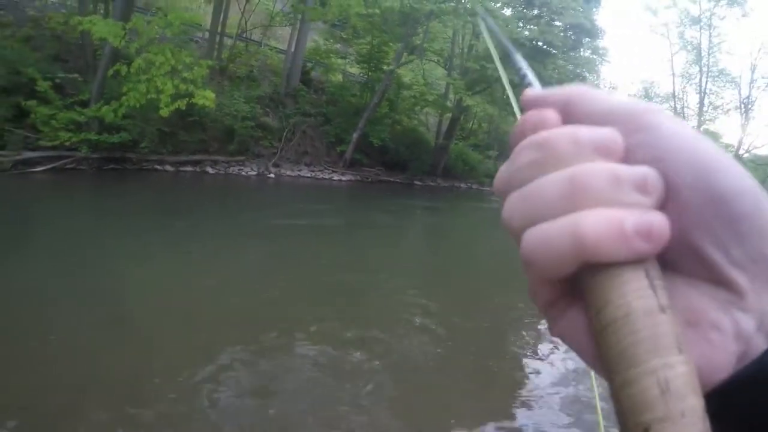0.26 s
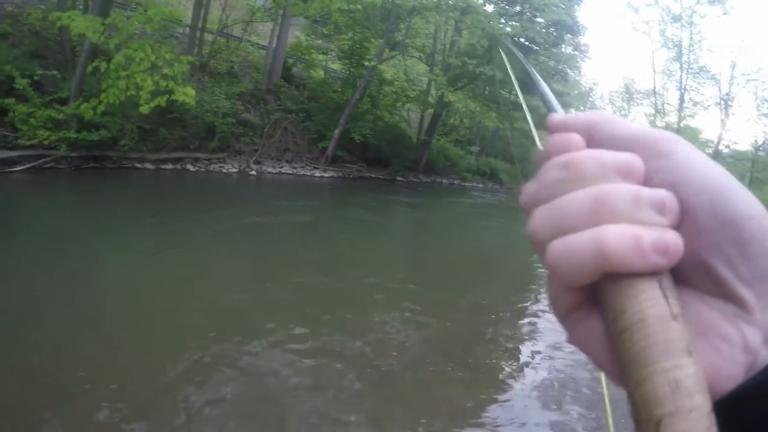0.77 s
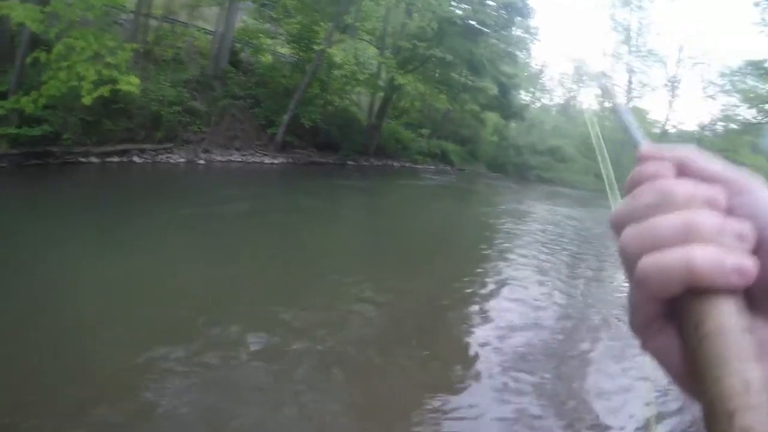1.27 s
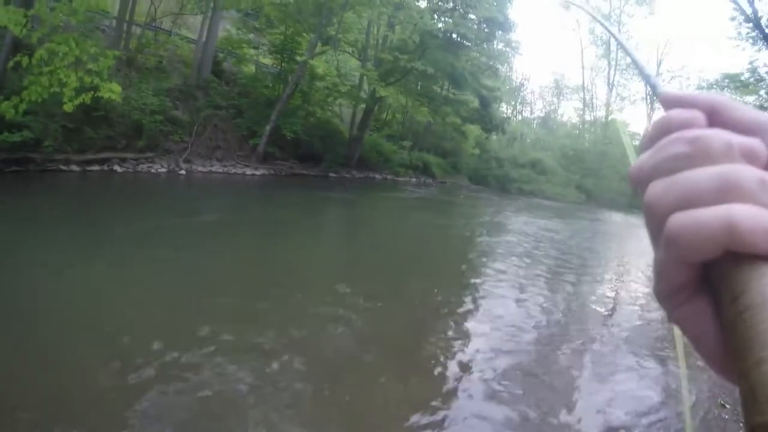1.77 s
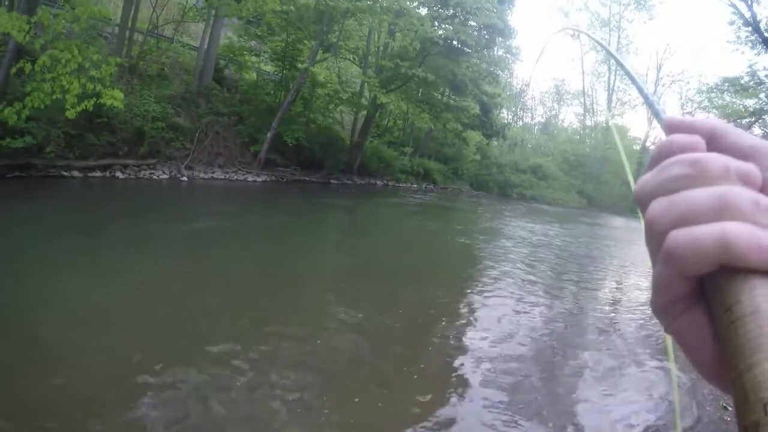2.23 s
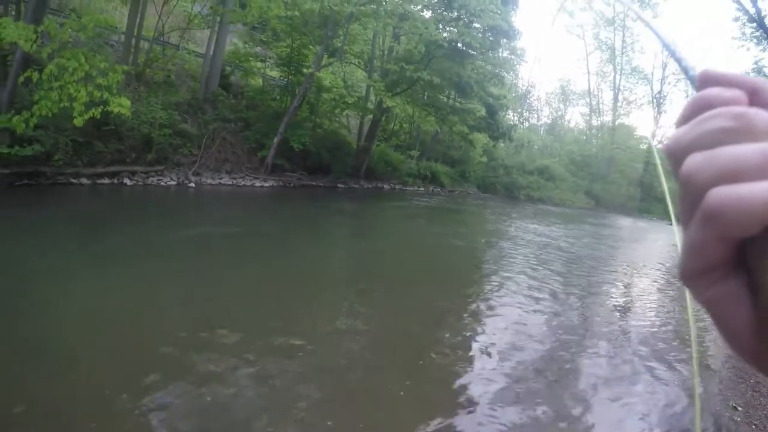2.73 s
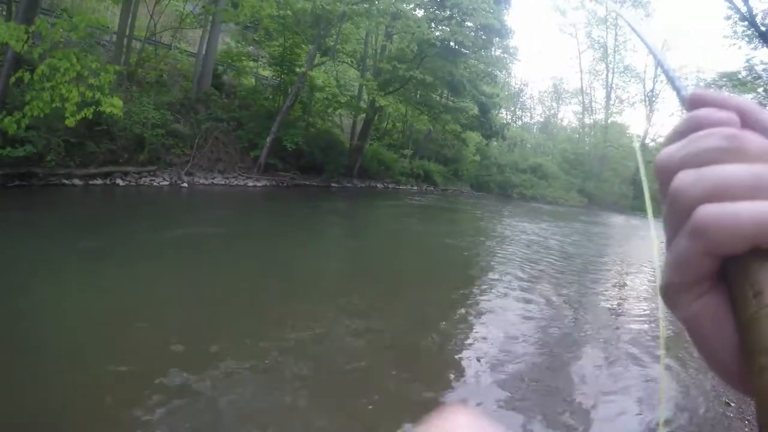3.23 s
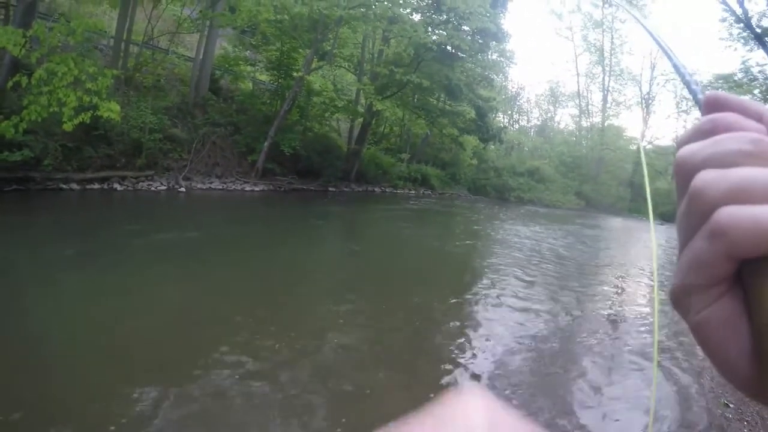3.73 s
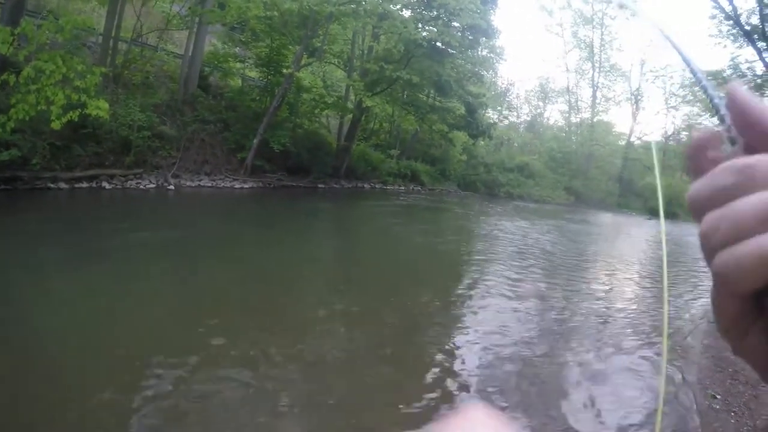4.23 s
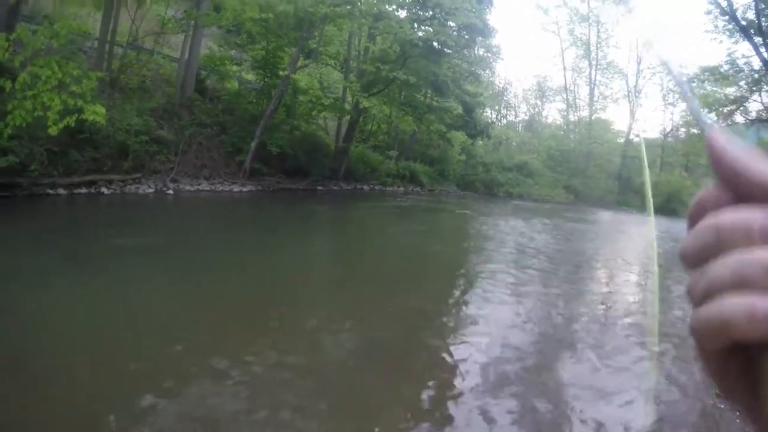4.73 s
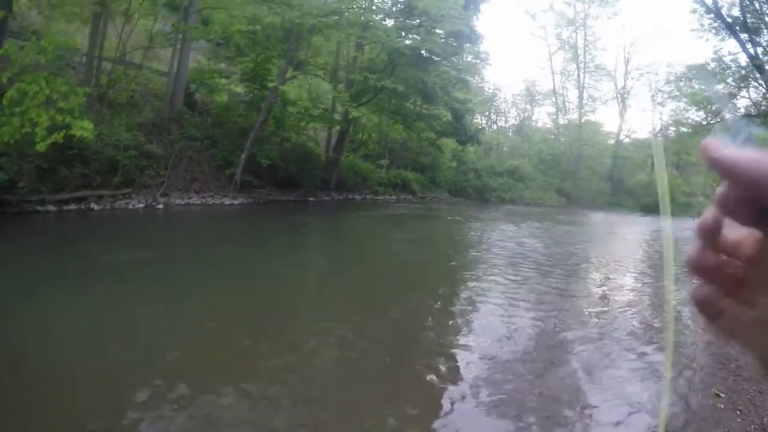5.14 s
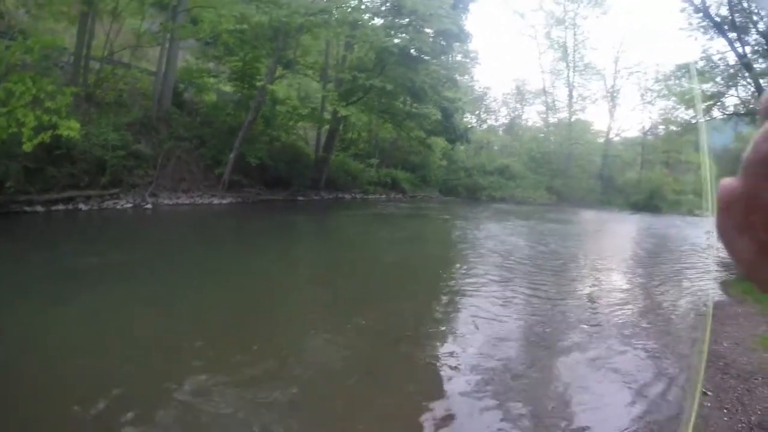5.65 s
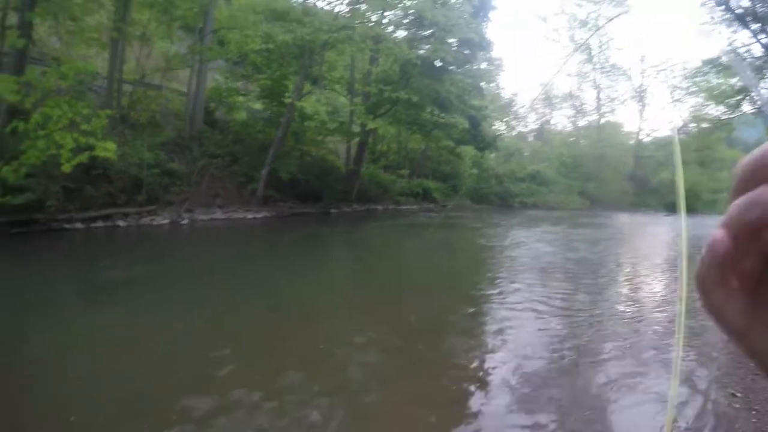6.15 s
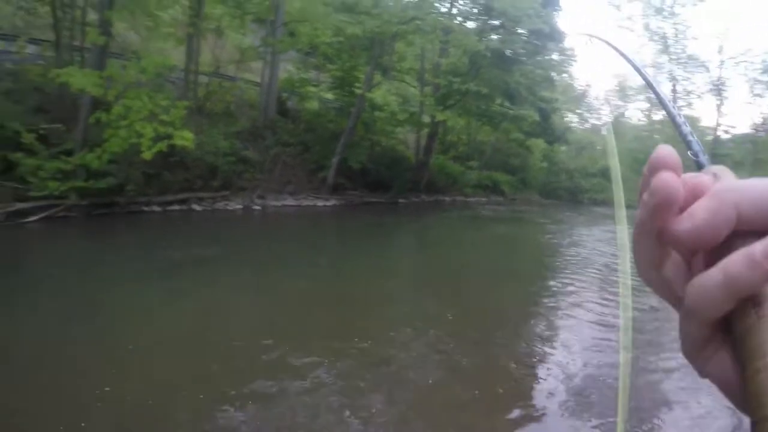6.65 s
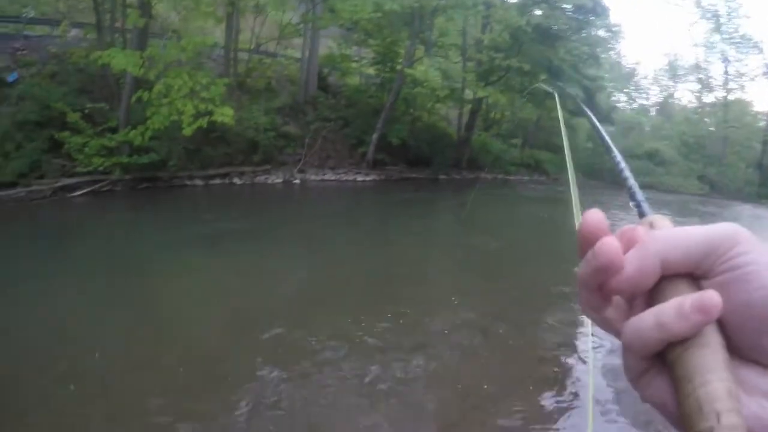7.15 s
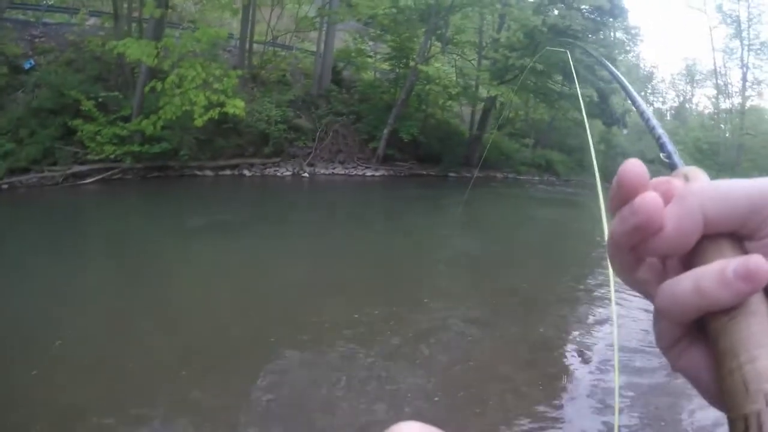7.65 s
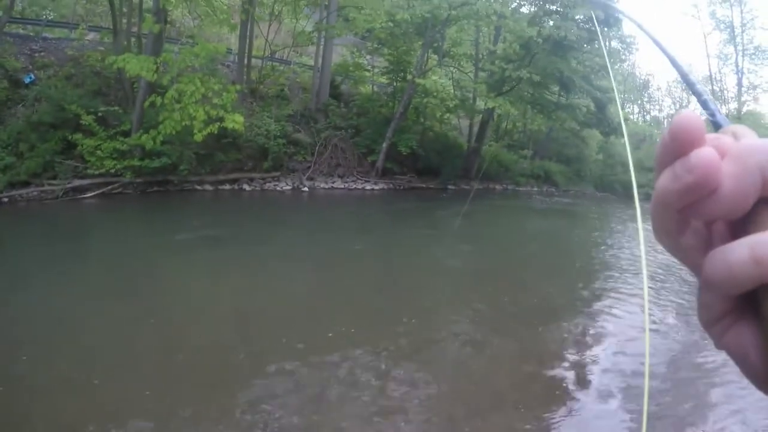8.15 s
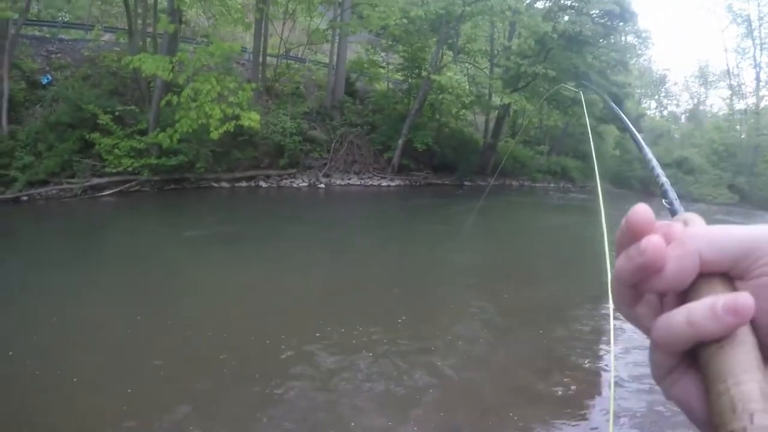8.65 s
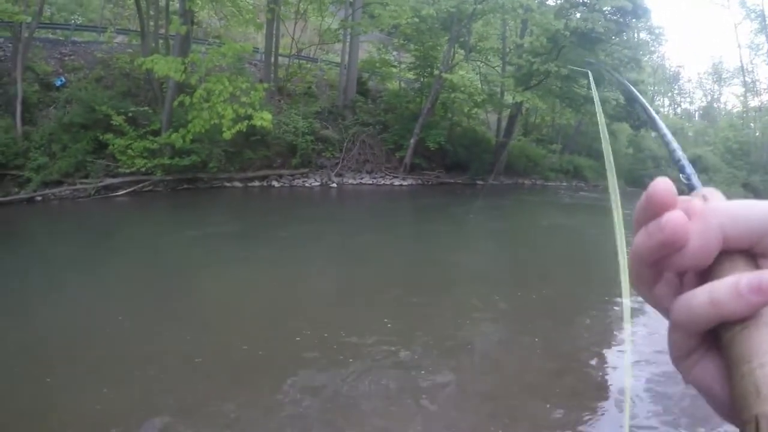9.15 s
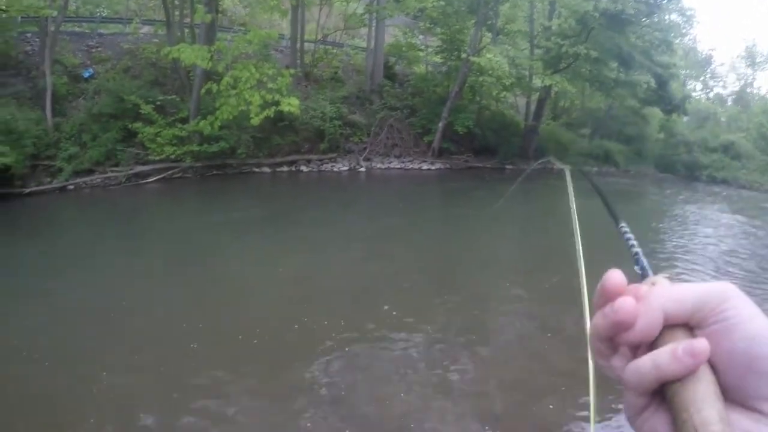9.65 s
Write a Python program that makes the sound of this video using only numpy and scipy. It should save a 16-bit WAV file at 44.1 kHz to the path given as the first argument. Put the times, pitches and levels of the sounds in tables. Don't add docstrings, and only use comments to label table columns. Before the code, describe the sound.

Outdoors by a quiet stream, heard from a chest-worn microphone with constant low sway rumble, soft bassy thumps, strap rub and light cloth rustle; the water is a very faint distant hiss. From 0.15 to 0.6 s a fly reel is wound: about eight bright, dry metal clicks. At 1.1 s a short fast zip of clicks, then a slightly longer one from 1.28 to 1.42 s. Handling thumps and small knocks fill a pause. From 3.0 to 5.0 s steady cranking ticks about twenty times a second, with a brief gap near 4.3. Then mostly bumps, and around 5.9 to 6.8 s tiny line squeaks and scrapes. A hollow knock comes at 6.8. From 6.9 s single sharp clicks come irregularly, closer together after 8.5, crowding past 9.3, and from 9.67 accelerating into a buzzing whir until 9.88, with a heavy low thump and a scrape.

```python
import sys
import numpy as np
from scipy import signal
from scipy.fft import rfft, irfft
from scipy.io import wavfile
from scipy.ndimage import uniform_filter1d

SR = 44100
rng = np.random.default_rng(int(sys.argv[2]) if len(sys.argv) > 2 else 0)


def gain_from_db(level_db):
    decades = np.asarray(level_db, float) / 20
    return 10 ** decades


def pcm_store(signal):
    levels = np.round(np.clip(np.atleast_2d(signal), -1, 1) * 32767)
    wavfile.write(sys.argv[1], SR, levels.astype(np.int16).T)


N = 435708
SNAP_LEN = 2048


def band(lo_hz, hi_hz, length=N):
    sos = signal.butter(2, [lo_hz, hi_hz], "band", fs=SR, output="sos")
    y = signal.sosfilt(sos, rng.standard_normal(length))
    return y / y.std()


def walk(rate_hz):
    hold = int(SR / rate_hz)
    steps = np.repeat(rng.standard_normal(N // hold + 1), hold)
    slewed = uniform_filter1d(uniform_filter1d(steps, hold), hold)[:N]
    return 2 * np.tanh(.85 * slewed)


def add(out, times, rows):
    for s, row in zip(times, rows):
        i = max(int(s * SR), 0)
        out[i:i + len(row)] += row[:len(out) - i]


def chatter(count, swell_ms, tail_ms, tail_db, strike=0):
    ms = np.arange(SNAP_LEN // 2) * 1000 / SR
    bell = np.exp(-(ms / swell_ms - 2) ** 2)
    onset = 1 - np.exp(-(ms / swell_ms / 2) ** 2)
    tail = gain_from_db(tail_db) * onset * np.exp(-ms / tail_ms)
    return (bell + tail) * rng.standard_normal((count, len(ms))) + strike * (bell == bell.max())


def resonate(burst, modes, scatter_db, detune, shift=1):
    f = np.arange(SNAP_LEN // 2 + 1) * SR / SNAP_LEN + 1
    chance = rng.standard_normal((len(burst), len(modes), 2))
    response = 0
    for k, (hz, width, db) in enumerate(modes):
        centre = shift * hz * (1 + detune * chance[:, k, :1])
        weight = (-1) ** k * gain_from_db(db + scatter_db * chance[:, k, 1:])
        response = response + weight / (1 + 1j * (f - centre ** 2 / f) / width) ** 2
    return irfft(rfft(burst, SNAP_LEN) * response, SNAP_LEN)


def peak_to(rows, db):
    top = uniform_filter1d(2 * rows ** 2, size=40, axis=1).max(axis=1)
    return rows * (gain_from_db(db) / np.sqrt(top))[:, None]


def reel():
    return winding() + paying_out() + bounces()


# t/s, rattle level/dB, frame level/dB, frame f/Hz, rim level/dB
WIND_FIRST = [(0.1552, -33, -37.5, 3270, -70), (0.2224, -30.0, -45, 3220.0, -55),
              (0.26, -25.5, -36, 3240.0, -55), (0.3068, -19.5, -42, 3770.0, -61.0),
              (0.3515, -24.0, -40, 3590.0, -64.0), (0.39, -25, -34.5, 3940, -68.5),
              (0.4425, -25, -34.5, 3800, -73.0), (0.6027, -26, -31, 3460, -76.0)]
WIND_SECOND = [(2.9755, -23.5, -34, 3280, -68), (3.0386, -24.0, -38, 3260.0, -49),
               (3.0804, -24, -39.5, 3330, -62), (3.1261, -25, -38.5, 3480.0, -63.5),
               (3.191, -23.5, -32.5, 3360, -69.0), (3.243, -24.5, -34.5, 3620, -62.0),
               (3.294, -23, -35, 3400, -64.5), (3.3614, -26, -36, 3500, -66),
               (3.4003, -26.5, -32.5, 3740, -49), (3.4334, -25.5, -30, 3970.0, -64.5),
               (3.4745, -22.5, -39.0, 3560.0, -64.0), (3.5363, -21.5, -36.5, 3230, -63),
               (3.5754, -22, -38, 3450.0, -61), (3.6319, -25.0, -36.5, 3330, -74.0),
               (3.6935, -26, -39.5, 3700, -69.0), (3.7421, -24.5, -34.5, 3570, -66),
               (3.8147, -26.5, -36, 3400, -71), (3.8625, -25, -35.5, 3510, -50),
               (3.8998, -25.5, -36.5, 3770, -51), (3.939, -26, -34, 3600.0, -52),
               (3.9843, -25.5, -39.0, 3460, -62), (4.0411, -26, -37, 3700, -60),
               (4.087, -23.5, -39.5, 4020.0, -55), (4.1644, -26.5, -35.5, 3380, -59),
               (4.2261, -25, -35.0, 3620, -66.5)]
WIND_THIRD = [(4.4233, -26.0, -31.5, 3440, -58), (4.4694, -22.5, -30.5, 3160, -67.5),
              (4.5097, -22.5, -35, 3880, -69.0), (4.545, -23.5, -30.5, 3960, -61),
              (4.584, -25.5, -32, 3800, -50), (4.6242, -21.5, -34.5, 3670.0, -55.5),
              (4.6686, -23.5, -42, 3460.0, -49), (4.7046, -23.5, -39.5, 3620, -54),
              (4.7561, -28.5, -42, 4050.0, -68), (4.7969, -22.5, -33.5, 3720.0, -62),
              (4.8374, -23.5, -33.5, 3400, -67), (4.8609, -27, -36, 3520.0, -71.0),
              (4.901, -23, -35.0, 3620.0, -68.5), (4.9544, -24, -32.5, 3810.0, -44),
              (4.9968, -26, -34.5, 3820, -62), (5.037, -25, -38.5, 3700, -46)]
# f/Hz, width/Hz, level/dB
FRAME_IN = [(3600, 760, 2.5), (4360, 200, -5.5), (3160, 280, -6.5)]


def winding():
    s, rattle_db, frame_db, hz, rim_db = np.transpose(WIND_FIRST + WIND_SECOND + WIND_THIRD)
    tilt_db = 2.5 * rng.uniform(-0.38, 0.35, len(s))
    return snaps(s, rattle_db, frame_db, tilt_db, rim_db, FRAME_IN, hz / FRAME_IN[0][0],
                 strike=6, knock_tail_db=0, seat_db=-16, butt_db=-17)


# t/s, rattle level/dB, frame level/dB, spool-over-pawl level/dB, rim level/dB
CREEP = [(6.9214, -20, -32, 1, -56.5), (7.1034, -21, -27.5, 0, -51), (7.3132, -21.5, -28.5, -0.5, -57),
         (7.7654, -18, -25.5, -2.5, -72.5), (7.8582, -22.5, -30, 0, -66.0), (8.0209, -24, -33, 0.5, -63),
         (8.3024, -22.5, -32.5, 0, -65), (8.4793, -21.5, -30.5, -1.5, -66.0), (8.5616, -23, -31.5, 2, -56),
         (8.6878, -19, -31.5, -2.0, -68.5), (8.7403, -21.5, -33.5, -2.5, -66),
         (8.8566, -22.5, -33.5, 0.0, -76.5), (8.9985, -25, -30, -2.5, -66.0),
         (9.0913, -21.5, -25.5, -2.5, -74.5), (9.1347, -24.5, -29.5, 1.0, -57),
         (9.172, -25.5, -32, -3.5, -76.0), (9.2108, -26, -32.5, -4, -53), (9.2597, -24, -28.5, -1, -57),
         (9.2849, -22, -32.5, 0, -65.5), (9.3139, -22, -30.5, 0.5, -66.5), (9.3676, -21, -30, 0, -57),
         (9.4006, -21, -31, 0.5, -59), (9.4245, -20.0, -22.5, -0.5, -52), (9.4604, -22, -26.5, -1, -64.0),
         (9.5177, -26.5, -29.5, -4, -63.0), (9.5502, -27, -30.5, 0, -67.5),
         (9.5775, -26.0, -29.5, -3, -49.5), (9.6051, -24, -27.5, -2.5, -51),
         (9.6288, -20.5, -33.5, -2, -51), (9.6509, -16.0, -37, 0.5, -53)]
# f/Hz, width/Hz, level/dB
FRAME_OUT = [(3280, 480, 3.5), (3800, 500, -7.5), (4450, 500, -14), (2600, 200, -15)]


def paying_out():
    s, rattle_db, frame_db, tilt_db, rim_db = np.transpose(CREEP + runs())
    return snaps(s, rattle_db, frame_db, tilt_db, rim_db, FRAME_OUT, np.ones(len(s)),
                 strike=8, knock_tail_db=-5, seat_db=-22, butt_db=-20)


# t/s, rattle level/dB, frame level/dB, spool-over-pawl level/dB
RUNS = [
    [(1.105, -22.5, -24.5, -1.5), (1.1217, -22.5, -27, 0), (1.1353, -23.5, -26.5, 2.0),
     (1.1487, -23, -29, 1.5), (1.1662, -20.5, -28.5, 0)],
    [(1.2788, -20.5, -28, 0.0), (1.3069, -18.5, -33, -1), (1.3226, -22, -30, 1), (1.3349, -24, -25.5, -0.0),
     (1.3462, -22.0, -31, 0), (1.3573, -25.5, -33.0, -3), (1.3637, -28, -32, 4), (1.3748, -24.0, -31, 0.5),
     (1.3856, -22, -28, 0.5), (1.3962, -21, -27, 1), (1.4065, -22, -24.5, -1.5), (1.4198, -19.5, -34, 0)],
    [(9.6702, -21, -23.5, -1), (9.6829, -25.0, -29, -1.5), (9.6932, -22.0, -28.5, 0.0),
     (9.7021, -22.5, -28, -1), (9.7108, -22, -29, -3.0), (9.7194, -23, -32, -0.0), (9.7279, -22, -35.0, 1),
     (9.7367, -24.0, -34, -1.0), (9.7461, -21.0, -31.5, -0.5), (9.7558, -23.0, -31, -4.0),
     (9.7657, -21, -30, -2.5), (9.7757, -23.0, -29.5, 0.5), (9.7863, -20.5, -33, 1.5),
     (9.797, -20, -27.5, 3.0), (9.8065, -22.5, -29, -1), (9.815, -20.0, -34.0, 1.5),
     (9.8229, -21, -31, 1.5), (9.8301, -23, -34.0, 0), (9.8366, -22, -28, 1.0), (9.8434, -20.0, -31, 1),
     (9.8495, -23, -27.5, -2.0), (9.8557, -22.5, -28.5, -1.5), (9.8615, -23.0, -27, 1),
     (9.8675, -22.5, -28, 1.0), (9.8735, -22.0, -35, 0.5)] + [(9.879, -24, -22, 0)],
]


def runs():
    rebound_at, rattle_drop_db, frame_drop_db = .55, -19, -17
    rim_base_db = -66
    rows = []
    for run in RUNS:
        teeth = np.array(run)
        chance = rng.uniform(-4, 4, (len(teeth), 3))
        s = teeth[:-1, 0] + rebound_at * np.diff(teeth[:, 0])
        rebound_db = teeth[:-1, 1:3] + [rattle_drop_db, frame_drop_db] + chance[1:, :2]
        rebound_rim_db = rim_base_db + rattle_drop_db + chance[1:, 2]
        rows += list(np.c_[teeth, rim_base_db + chance[:, 2]])
        rows += list(np.c_[s, rebound_db, teeth[:-1, 3], rebound_rim_db])
    return rows


# f/Hz, width/Hz, level/dB
SPOOL = [(5000, 240, -4), (6040, 450, 0.5), (5730, 7600, -8.5), (7030, 480, 2.5)]
TIP = [(9280, 780, 11), (9900, 21400, -3.5), (12270, 490, 7), (13050, 760, 9), (15400, 1100, -1.5)]
SEAT = [(1990, 190, 5), (2560, 190, 4.5), (1590, 350, -4.5)]
# f/Hz, width/Hz, level/dB
RINGS = [(8950, 120, -34), (3900, 100, -28)]


def snaps(s, rattle_db, frame_db, tilt_db, rim_db, frame_modes, shift, strike, knock_tail_db, seat_db, butt_db):
    out, count = np.zeros(N), len(s)
    frame_db = frame_db + 6.5
    spool_db = rattle_db - 7 + tilt_db
    tip_db = rattle_db - 6.5 - tilt_db
    loudest_db = np.maximum(frame_db, spool_db)

    blow = chatter(count, .45, 2.2, knock_tail_db, strike)
    frame = peak_to(resonate(blow, frame_modes, 2, .012, shift[:, None]), frame_db)
    spool = peak_to(resonate(chatter(count, .45, 3.4, -4, strike=3), SPOOL, 2, .015), spool_db)
    tip = peak_to(resonate(chatter(count, .45, 2.4, -4, strike=4), TIP, 1.5, .02), tip_db)
    body = frame + spool + tip
    rings = 0
    for hz, width, db in RINGS:
        gain = gain_from_db(db + 5 * rng.standard_normal((count, 1)))
        rings = rings + gain * peak_to(resonate(body, [(hz, width, 0)], 0, .005), spool_db)

    seat = peak_to(resonate(chatter(count, 0.99, 2.2, -13), SEAT, 4.0, 0.06), loudest_db + seat_db)
    butt_modes = [(230, 260, 0), (560, 380, -8)]
    butt = resonate(chatter(count, 1.6, 6.0, -10), butt_modes, 2.0, .15)
    butt = peak_to(butt, loudest_db + butt_db + 2 * rng.standard_normal(count))
    add(out, s - .0006, body + rings + seat + butt)

    t = np.arange(2 * SNAP_LEN) / SR
    rim_hz = 7140 * (1 + .003 * rng.standard_normal((count, 1)))
    decay = np.exp(-t / 0.014)
    add(out, s, gain_from_db(rim_db)[:, None] * decay * np.sin(2 * np.pi * rim_hz * t))
    return out


# t/s, frame level/dB, pawl tip level/dB
BOUNCES = [(0.192, -43, -57), (0.284, -51, -51), (0.357, -24.5, -53), (1.2375, -48, -65),
           (8.5734, -25.5, -28.5), (0.1736, -35, -62), (0.236, -41, -49), (0.8542, -37, -74),
           (0.866, -40, -72), (3.152, -38, -47), (2.913, -47, -53), (2.928, -52, -53), (0.41, -48, -70),
           (4.975, -42, -65), (3.2313, -39, -69), (3.856, -35, -69), (4.02, -38, -39), (4.0572, -32.5, -51),
           (4.234, -38, -55), (4.713, -39, -45), (4.8807, -35, -64), (7.8535, -34, -80), (8.977, -39, -68),
           (9.0962, -47, -41), (9.1086, -35, -64), (9.3551, -38, -41), (9.376, -44, -55)]


def bounces():
    out, count = np.zeros(N), len(BOUNCES)
    s, frame_db, tip_db = np.transpose(BOUNCES)
    frame = peak_to(resonate(chatter(count, .6, 2.2, -9, strike=6), FRAME_OUT, 2.5, .015), frame_db)
    tip = peak_to(resonate(chatter(count, 0.25, 3.0, -3), SPOOL + TIP, 6.0, 0.024), tip_db)
    add(out, s - .0009, frame + tip)
    return out


# t/s, peak level/dB, f/Hz, crack level/dB
KNOCKS = [(0.158, -34, 645, -1.5), (0.238, -38, 646, -3), (0.359, -32.5, 528, -7), (1.019, -37, 500, -3.5),
          (2.173, -38, 503, -20), (3.049, -31, 400, -10), (3.535, -38, 620, -2), (3.741, -35, 458, -8),
          (5.962, -38.5, 303, 1), (6.77, -27, 430, -5), (7.6905, -27.5, 473, 2)]


def knocks():
    out = np.zeros(N)
    crack_modes = [(850, 500, 2), (1550, 800, 0), (2900, 800, -13), (3800, 700, -14)]
    for s, db, hz, crack_db in KNOCKS:
        hollow_modes = [(hz, 150, 0), (hz * .55, 180, -5)]
        hollow = resonate(chatter(1, .6, 12.0, -17, strike=8), hollow_modes, 0, 0)
        crack = resonate(chatter(1, .45, 4.0, -12, strike=8), crack_modes, 1, .05)
        add(out, [s], peak_to(hollow, np.array([db - 3.0])))
        add(out, [s], peak_to(crack, np.array([db + crack_db])))
    return out


# t/s, length/ms, f/Hz, level/dB
RUBS = [(4.38, 6, 3500, -52), (4.601, 30, 240, -44), (4.63, 14, 160, -45), (4.695, 25, 630, -50),
        (4.465, 12, 270, -48), (8.56, 34, 210, -49), (8.86, 29.3, 250, -53), (7.725, 94, 460, -54.5),
        (0.58, 37, 4000, -59), (9.78, 264, 283, -46), (.89, 126, 1570, -57.5), (1.06, 55, 1520, -58.5),
        (1.199, 88, 1500, -55.5), (2.175, 11, 3600, -60.5), (2.815, 10.4, 4100, -57.5),
        (3.0, 65, 3700, -58.5), (0.11, 30, 3400, -59), (0.45, 14, 1500, -55), (5.766, 15, 4000, -62),
        (6.07, 120, 1150, -61.5), (6.1, 250, 3600, -65.5), (6.355, 14, 4000, -60), (6.6, 140, 4100, -72),
        (6.87, 15, 4000, -60.5)]


def rubs():
    out, t = np.zeros(N), np.arange(-SR // 3, SR // 3) / SR
    for s, ms, hz, db in RUBS:
        grain = band(hz / 1.47, hz * 1.24, len(t))
        envelope = np.exp(-(t / (ms / 1800)) ** 4)
        add(out, [s - 1 / 3], [gain_from_db(db) * envelope * grain])
    return out * gain_from_db(3.5 * walk(90))


# t/s, length/ms, start f/Hz, end f/Hz, level/dB
SQUEAKS = [(5.916, 10, 3210, 3300, -58), (5.945, 12, 3900, 3950, -60), (6.058, 10, 1050, 1150, -53),
           (6.09, 14, 1080, 1150, -57), (6.155, 7, 2950, 3100, -61), (6.181, 10, 1080, 1160, -53),
           (6.22, 39, 4650, 5200, -68), (6.43, 45, 4700, 5250, -70), (6.546, 7, 1010, 1100, -47),
           (6.607, 14, 3280, 3320, -64), (6.65, 12, 2950, 3300, -60), (6.675, 60, 2000, 5000, -65),
           (6.72, 14, 1050, 1120, -54), (6.745, 25, 5000, 3800, -65), (6.75, 25, 2250, 2150, -61),
           (6.818, 8, 3250, 3300, -59)]


def squeaks():
    out = np.zeros(N)
    for s, ms, from_hz, to_hz, db in SQUEAKS:
        u = np.linspace(0, 1, int(ms * SR / 700))
        wobble = 1 + .5 * uniform_filter1d(rng.standard_normal(len(u)), size=60)
        hz = from_hz * (to_hz / from_hz) ** u * wobble
        tone = np.sin(2 * np.pi * np.cumsum(hz) / SR)
        add(out, [s - len(u) / SR / 2], [gain_from_db(db + 5) * np.sin(np.pi * u) ** 2 * tone])
    return out


# t/s, peak level/dB, f/Hz, strap rub level/dB
THUMPS = [(0.25, -30.5, 36.2, -41), (0.307, -29.5, 56.7, -38.5), (0.794, -31, 31.8, -45.5),
          (1.03, -27, 55.6, -43), (1.17, -26.5, 54, -39), (1.43, -23.5, 69, -29.5),
          (1.918, -29.5, 32.2, -67), (2.243, -26, 36, -70), (2.486, -29, 37, -68),
          (2.789, -26.5, 36.7, -59), (3.026, -27, 39, -43), (3.606, -25, 51, -47), (3.752, -21, 74, -42),
          (3.974, -25.5, 60, -39.5), (4.521, -26.5, 46.6, -50), (4.669, -37, 43, -34.5),
          (4.991, -22.5, 46, -30.5), (5.46, -23.5, 42.5, -42.5), (5.946, -24.5, 32.8, -61),
          (6.282, -24, 30.2, -43.5), (6.413, -27.5, 38, -64), (6.89, -23.5, 36.7, -55),
          (6.996, -21.5, 27.8, -39.5), (7.358, -25, 26.3, -38.5), (7.819, -25, 33.6, -47),
          (8.306, -26.5, 31.8, -44), (8.795, -25, 35, -61), (9.326, -27, 35, -38), (9.679, -32, 49.6, -36),
          (9.853, -19, 46, -29)]


def thumps():
    swing, rub = np.zeros(N), np.zeros(N)
    half = 4410
    t, jolts = np.arange(-half, half) / SR, THUMPS + fidgets()
    for (s, db, hz, rub_db), (turn, slack) in zip(jolts, rng.random((len(jolts), 2))):
        bell = np.exp(-(t * hz / (0.61 + 0.31 * slack)) ** 2)
        cycles = turn + hz * t * (1 - 4.1 * t)
        add(swing, [s], [gain_from_db(db) * bell * np.cos(2 * np.pi * cycles)])
        add(rub, [s], [gain_from_db(rub_db - 8.5) * np.exp(-(t / 0.018) ** 2)])
    swing, rub = (np.append(v[half:], np.zeros(half)) for v in (swing, rub))
    return swing + rub * (band(68, 175) + gain_from_db(-7) * band(187, 303) + gain_from_db(-9.5) * band(200, 790))


def fidgets():
    per_s = 4
    chance = rng.random((int(per_s * N / SR), 4)).T
    s = (np.arange(len(chance[0])) + chance[0]) / per_s
    db = moving_db(s) + 10 + 8 * (chance[1] - .5)
    hz = 43.8 * 2 ** (chance[2] - .4)
    rub_db = db - 15.5 + 5 * (chance[3] - .5)
    return list(zip(s, db, hz, rub_db))


# t/s, level/dB
MOTION = [(0.0, -43), (0.45, -42.5), (0.85, -44), (1.24, -39.5), (1.5, -42), (1.9, -49), (2.67, -51),
          (3.19, -40), (4.3, -40.5), (4.65, -37), (5.26, -45), (5.9, -44), (6.58, -42.5), (7.5, -44.5),
          (8.83, -43.5), (9.3, -42.5), (9.6, -37), (9.88, -34)]


def moving_db(s):
    return np.interp(s, *np.transpose(MOTION))


def motion():
    sway_db = moving_db(np.arange(N) / SR)
    rub_db = -55.5 + 1.2 * (sway_db + 44)
    rustle_db = -59 + 0.7 * (sway_db + 44)
    lurch = 3.5 * walk(22)
    sway = gain_from_db(sway_db - 2.5 + lurch) * (band(18.3, 32.2) + band(34.6, 83.3))
    creak = 6.5 * np.abs(walk(60))
    strap = band(57, 224) + gain_from_db(-3.5) * band(129, 377) + gain_from_db(-6.5) * band(477, 870)
    rub = gain_from_db(rub_db - 13.5 + lurch + creak) * strap
    patches = 1.5 * walk(35)
    rustle = 0
    for hz, db in [(2300, -11.0), (3200, -10), (4200, -10.5), (5600, -13.5), (8000, -17.5)]:
        rustle = rustle + gain_from_db(rustle_db + db + patches + 2 * walk(60)) * band(hz / 1.495, hz * 0.99)
    return sway + rub + rustle


# f/Hz, density level/dB per Hz
STREAM = [(150, -9.5), (480, 4.5), (800, -7.5), (1080, 5), (1430, -4), (1750, 2), (2350, -15.5),
          (3300, -12), (5000, -32), (9000, -21.5), (15200, -22), (16000, -45)]


def stream():
    out, swell = 0, walk(1.0)
    hz, db = np.transpose(STREAM)
    f = np.arange(N // 2 + 1) * SR / N + 1
    colour = gain_from_db(np.interp(np.log(f), np.log(hz), db, left=-60, right=-90))
    for centre in 160 * 2 ** np.arange(0, 6.8, .4):
        share = np.exp(-(np.log2(f / centre) / 0.4) ** 2)
        water = irfft(rfft(rng.standard_normal(N)) * colour * share, N)
        out = out + gain_from_db(swell + 2.14 * walk(14)) * water
    return out * gain_from_db(-59.5) / out.std()


def scene():
    return (reel() + knocks() + rubs() + squeaks() + thumps() + motion() + stream())[None]


def roll_off(x):
    return signal.sosfilt(signal.butter(12, 16630, fs=SR, output="sos"), x)


def record(dry):
    low_cut = signal.butter(2, 14, "high", fs=SR, output="sos")
    top_cut = signal.ellip(6, .3, 22, 15350, fs=SR, output="sos")
    mix = signal.sosfilt(np.vstack([low_cut, top_cut]), dry)
    return roll_off(mix)


dry = scene()
out = record(dry)
pcm_store(out)
```